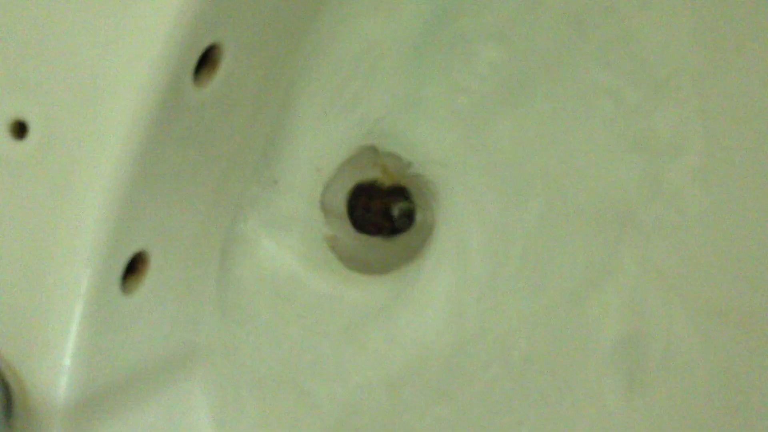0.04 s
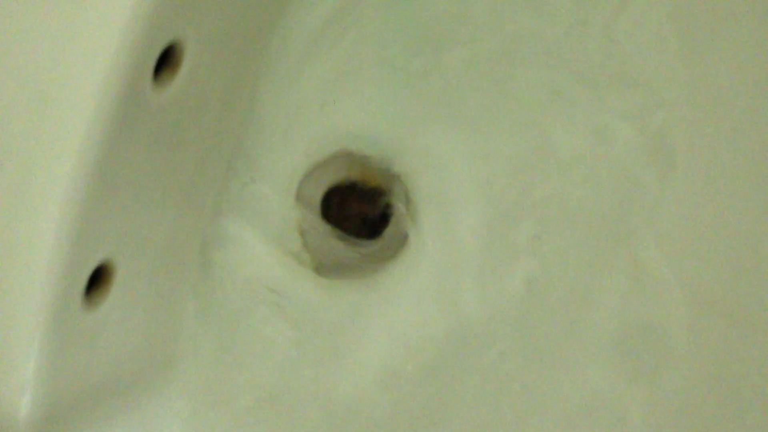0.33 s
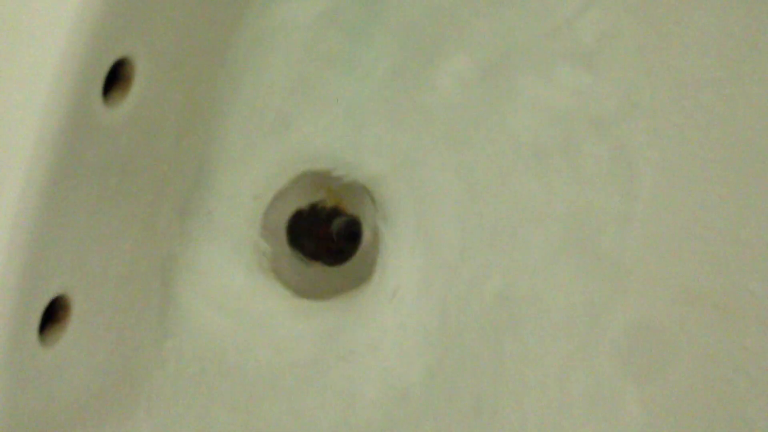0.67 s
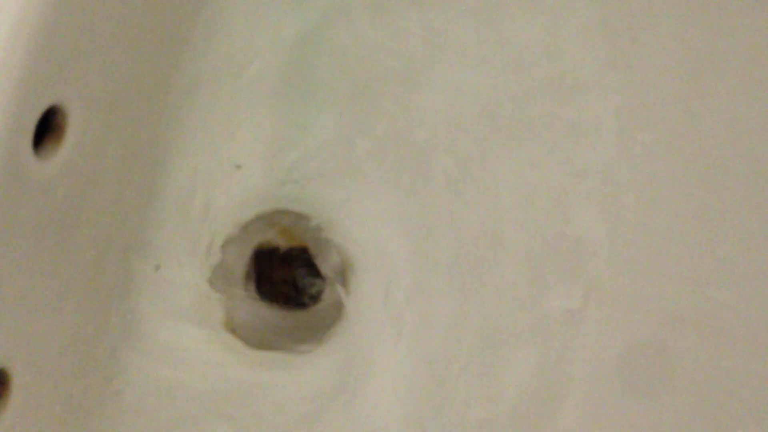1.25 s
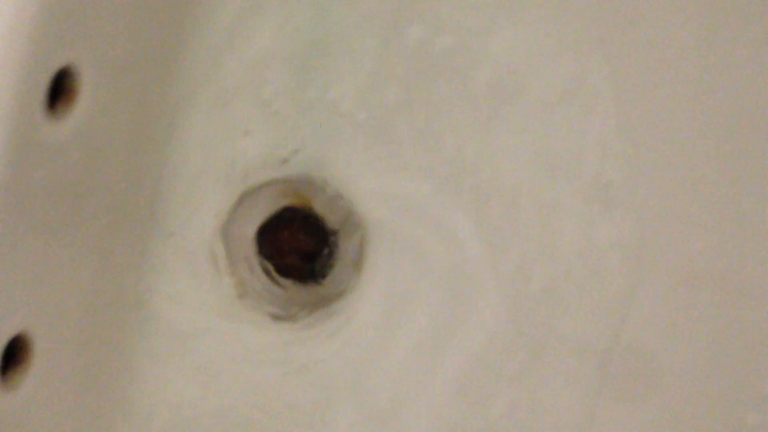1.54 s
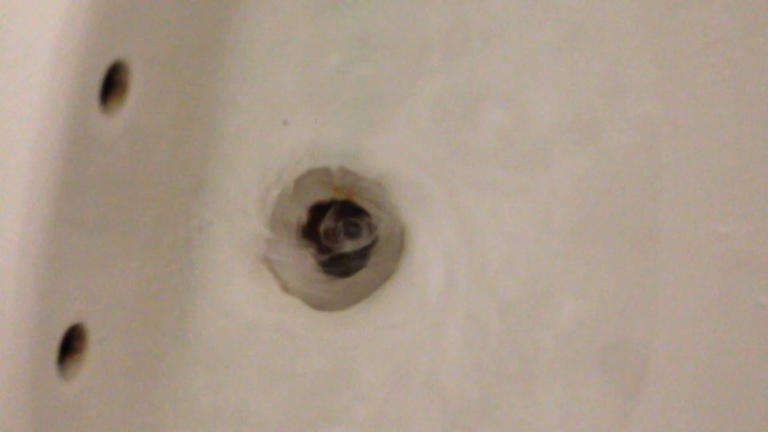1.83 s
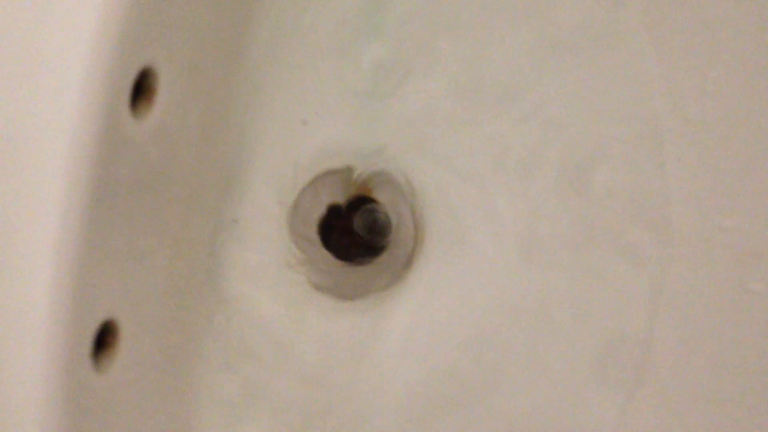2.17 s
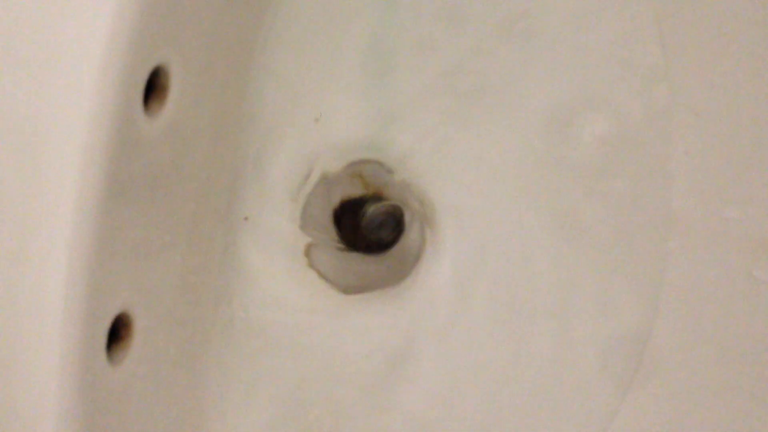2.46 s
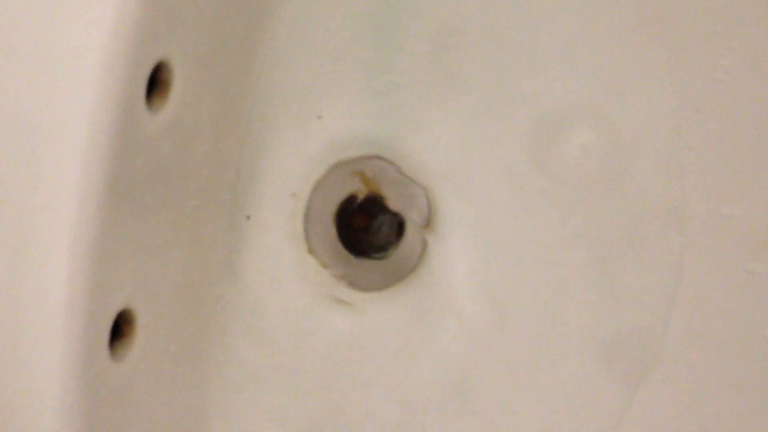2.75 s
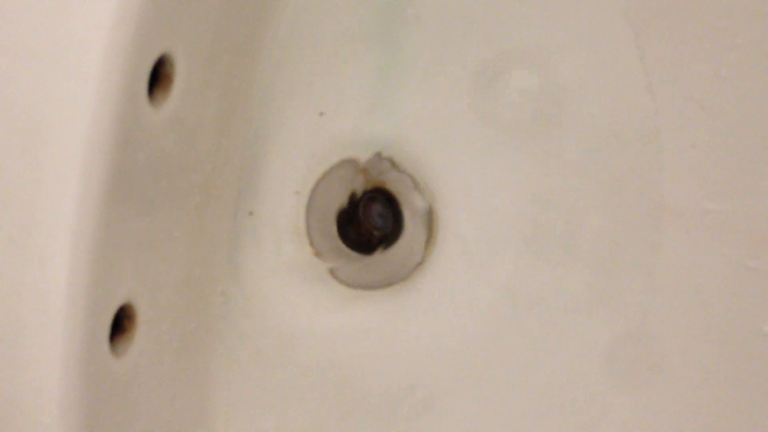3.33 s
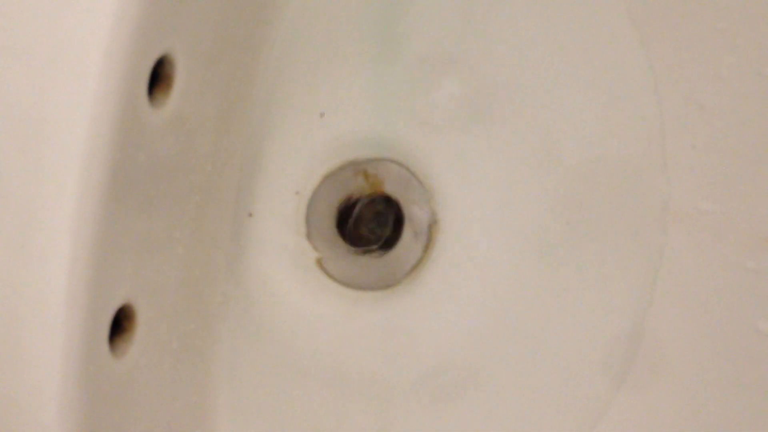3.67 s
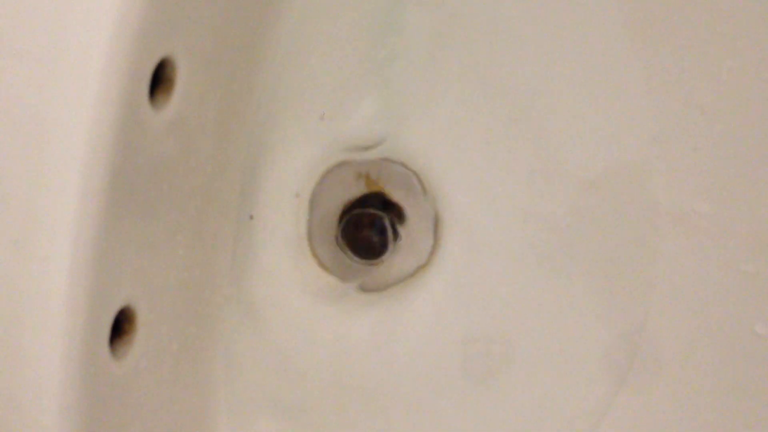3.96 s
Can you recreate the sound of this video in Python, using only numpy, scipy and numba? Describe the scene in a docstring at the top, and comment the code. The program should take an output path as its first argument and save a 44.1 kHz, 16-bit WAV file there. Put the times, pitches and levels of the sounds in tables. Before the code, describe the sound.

Water swirls down a bathtub drain in a small tiled room, a bubbly rush broken by slurps, with gurgles and bloops in the pipe. At about 1.1 seconds the suction drops away, leaving a few drips and ticks until around 1.6 seconds. A very faint whistle swells and fades near 2.2 seconds. A low throbbing motor, like a pump or fan, hums throughout with faint hiss, ending around 4 seconds.

```python
"""The last water swirls down a bathtub drain in a small tiled room. The vortex sucks air: a rush of
tiny bubbles, broken by slurps, while the pipe gurgles and bloops below. After a second the vortex
closes and leaves a few drips and ticks, then a faint whistle swells and fades. A motor, perhaps a
pump or fan, there from the start, throbs on to the end with a faint hiss."""
import sys
import numpy as np
from scipy import signal
from scipy.fft import rfft, irfft
from scipy.io import wavfile
from scipy.ndimage import uniform_filter1d
from numba import njit

SR = 44100
rng = np.random.default_rng(int(sys.argv[2]) if len(sys.argv) > 2 else 0)


def log_audio(samples):
    """Write samples as a 16-bit WAV file to the path given in sys.argv[1]."""
    # one column per channel
    frames = np.atleast_2d(samples).T
    # limit to full scale, then quantise
    limited = np.clip(frames, -1, 1)
    pcm = np.round(limited * 32767).astype(np.int16)
    wavfile.write(sys.argv[1], SR, pcm)


N = 176400
TIME = np.arange(N) / SR

# envelope of the air drawn into the vortex: t/s, level/dB
SUCTION_ENVELOPE = [(.08, -31.5), (.25, -32), (.48, -32.5), (.68, -33), (.78, -33), (.93, -31.5),
                    (1.06, -33), (1.11, -45.5), (1.24, -49.5), (1.45, -51.5), (1.7, -53.5)]
# colour of the rushing bubbles: f/Hz, level/dB
RUSH_EQ = [(380, -44.5), (650, -1.5), (723, -22), (950, -11.5), (1170, -5.5), (1460, -1.5), (1600, -2),
           (1900, -7), (2090, -2), (2480, -1.5), (2690, -1.5), (3150, -3), (4000, 1.5), (4450, -1.5),
           (5360, 1.5), (6120, -2), (7670, -3.5), (9490, -6.5), (11400, -10.5), (14700, -13.5),
           (15500, -12)]
# slurps, each a knot of bubbles: t/s, level/dB, f/Hz, length/s
SLURP_CUES = [(0.135, -25, 2420, .004), (0.16, -22, 4060, .004), (.208, -27.5, 5000, 0.0016),
              (0.232, -26.5, 3870, 0.0019), (0.254, -26, 3950, 0.0028), (0.28, -21.5, 3530, .004),
              (0.326, -26.5, 5630, 0.0024), (0.34, -22, 4430, .002), (0.431, -21.5, 3200, .002),
              (0.454, -25.5, 7400, 0.0029), (0.585, -25.5, 2080, 0.0039), (0.658, -24.5, 3730, .002),
              (0.732, -17, 3450, 0.0027), (0.751, -28, 4460, .002), (0.769, -19, 3080, 0.0041),
              (0.785, -18.5, 3550, 0.0012), (0.813, -23, 4080, 0.0017), (0.837, -20, 2800, .005),
              (0.849, -18, 4310, .003), (.890, -20, 5300, .002), (0.919, -22.5, 3640, 0.0044),
              (.947, -24.5, 3600, 0.0017), (0.967, -27, 5970, .003), (0.981, -24, 2400, .004),
              (1.015, -23.5, 3380, .004), (1.038, -18, 3880, .0015), (1.073, -22.5, 2100, 0.001974),
              (1.096, -29, 1510, 0.00302), (1.114, -30, 3580, 0.0034), (1.281, -33.5, 2330, 0.0024),
              (1.413, -32.5, 4870, 0.0022), (1.417, -33.5, 1560, .003), (1.446, -37.5, 5300, .0015),
              (1.562, -38.5, 1900, .002)]
# resonances of the pipe: f/Hz, width/share of f, level/dB
PIPE_MODES = [(448, 0.07, 6.5), (529, 0.088, 8), (808, .09, 0), (926, 0.037, -1.5), (1208, 0.069, -1.5),
              (1370, 0.037, -5), (1560, 0.025, -1), (1753, 0.022, -3)]
# envelope of the gurgle in the pipe: t/s, level/dB
GURGLE_ENVELOPE = [(.08, -43), (.16, -38.5), (.32, -43), (.7, -44.5), (.98, -42.5), (1.15, -47), (1.6, -50)]
# single large bubbles: t/s, level/dB, f/Hz
BLOOP_CUES = [(.145, -38, 1356), (.147, -31.5, 533), (.152, -31, 850), (.181, -32, 542), (.283, -37, 530),
              (.612, -33, 1560), (.654, -35, 1534), (0.745, -38, 930), (0.945, -34.5, 1364),
              (1.038, -35.5, 1216), (1.381, -37.5, 950)]
# bursting films and drops: t/s, level/dB, f/Hz
TICK_CUES = [(.263, -38, 9500), (.785, -32, 11500), (.877, -36, 11400), (0.9971, -26, 11000),
             (1.0395, -27.5, 7700), (1.2, -33.5, 13800), (1.2795, -46, 8700), (1.318, -51, 11000),
             (1.359, -45, 5440), (2.0655, -50, 9000), (3.307, -43, 10700)]
# envelope of the last droplets: t/s, level/dB
TRICKLE_ENVELOPE = [(1.1, -48.5), (1.35, -53.5), (1.6, -68), (4, -78)]
# harmonics of the motor: multiple of the turn rate, level/dB
MOTOR_HARMONICS = [(2, -27.5), (4, -16), (5, -10.5), (6, -12.5), (7, -6), (8, -4), (9, 1.5), (10, -11.5),
                   (11, -17.5), (13, -12.5), (14, -13), (17, -28.5), (18, -29.5), (19, -16), (20, -21.5),
                   (21, -26.5), (22, -24), (23, -27.5), (25, -20), (26, -26), (28, -28)]
# colour of the motor's airflow: f/Hz, level/dB
RUMBLE_EQ = [(20, -20), (40, -17), (70, -11), (125, -2.5), (200, 0), (330, -11.5), (520, -17.5), (750, -23),
             (1500, -47)]
# colour of the hiss: f/Hz, level/dB
HISS_EQ = [(410, -34.5), (700, -1.5), (728, -5.5), (955, 1.5), (1030, -6), (1220, -0.5), (1320, -9.5),
           (1430, -5), (1560, -15.5), (1690, -4), (1850, -12.5), (2050, -6), (2280, -10.5), (2770, -9),
           (2990, -16), (3540, -19), (4190, -10.5), (4770, -16), (5360, -13), (7030, -21.5), (12400, -27.5),
           (14500, -38), (15500, -34)]

MOTOR_HZ = 23.4  # turns per second


def vortex():
    """Bubbles, fine spray and tiny bursting films come in spurts as long as the swirl draws air."""
    fizz = froth(per_s=9000, scatter_db=4.5)
    spray = undb(-1.5) * rng.standard_normal(N)
    rush = colour(fizz + spray, RUSH_EQ)
    snaps = (rng.random(N) < 1000 / SR) * undb(2 * rng.standard_normal(N))  # about 1000 a second
    sparkle = steep_band(snaps, hz=12100, width=.5)
    spurts = undb(.92 * walk(rate=64))
    return (level(rush, 0) + level(sparkle, -20)) * spurts * envelope(SUCTION_ENVELOPE)


def slurps(count=10, octaves=.25, spatter_s=.013, trim_db=-4):
    """The air core pinches off: a large bubble in a knot of others, a spit of spray, then a spatter."""
    out, t = np.zeros(N), np.arange(SR // 20) / SR
    cycles = np.full(count, 3.7)
    for s, db, hz, length in SLURP_CUES:
        when, pitch, size, late, shed = rng.uniform(-1, 1, (count, 5)).T
        knot = bubbles((1 + when) * length, hz * 2 ** (octaves * pitch), cycles, size, len(t))
        spatter = bubbles(abs(late) * spatter_s, hz * 2 ** shed, 2 * cycles, 1 - abs(late) / 2, len(t))
        spit = steep_band(rng.standard_normal(len(t)), hz, width=.96) * np.exp(-(t / length - 1) ** 2)
        lead = band(large_bubble(hz, cycles=10, samples=len(t)), hz, width=.52)
        db += trim_db
        add(out, s - length, level(knot, 0) + level(spit, -2), db)
        add(out, s - length / 2, lead, db - 11)
        add(out, s, spatter, db - 9)
    return out


def gurgle():
    """Water tumbling down the pipe rings its hollow resonances."""
    tumble = froth(per_s=1900, scatter_db=2)
    pipe = sum(undb(db) * band(tumble, hz, width) for hz, width, db in PIPE_MODES)
    return level(pipe, 0) * envelope(GURGLE_ENVELOPE)


def bloops(ring_s=.011):
    """Large bubbles ring short hollow notes deeper in the pipe."""
    out = np.zeros(N)
    for s, db, hz in BLOOP_CUES:
        add(out, s, large_bubble(hz, cycles=ring_s * hz, samples=SR // 10), db)
    return out


def ticks(decay_s=.00055):
    """Thin films burst with a bright snap."""
    out, t = np.zeros(N), np.arange(SR // 50) / SR
    for s, db, hz in TICK_CUES:
        snap = rng.standard_normal(len(t)) * np.exp(-t / decay_s)
        add(out, s, steep_band(snap, hz, width=.23), db)
    return out


def trickle():
    """A thin layer of droplets tails off as the vortex closes."""
    droplets = colour(froth(per_s=400, scatter_db=4), RUSH_EQ)
    return level(droplets, 0) * envelope(TRICKLE_ENVELOPE)


def froth(per_s, scatter_db, fine_hz=5000):
    """A cloud of bubbles of all sizes, even in spectrum, a few much louder than the rest."""
    when, pitch, ring, loud = rng.random((int(per_s * N / SR), 4)).T
    hz = 400 * 40 ** pitch  # 400 Hz to 16 kHz
    cycles = 4 * 2 ** (2 * ring - 1)
    spread_db = scatter_db * np.minimum(fine_hz / hz, 1) ** .44  # fine bubbles are more alike in level
    accent = -np.log(1 - .995 * loud) - 1.5
    gain = hz / np.sqrt(cycles) * undb(spread_db * accent)
    return level(bubbles(when * N / SR, hz, cycles, gain, N), 0)


def large_bubble(hz, cycles, samples):
    """One large bubble swells, then rings with only a slight upward bend."""
    one = np.ones(1)
    return bubbles(np.zeros(1), hz * one, cycles * one, one, samples, rise=.013, attack_cycles=2.7)


@njit
def bubbles(times, hz, cycles, gain, samples, rise=.041, attack_cycles=.7):
    """Each bubble rings as a damped sine whose pitch climbs by the share `rise` per decay time."""
    out = np.zeros(samples)
    for k in range(len(times)):
        first, decay, phase = int(times[k] * SR), cycles[k] * SR / hz[k], 0.
        for j in range(min(int(5 * decay), samples - first)):
            phase += 2 * np.pi * min(hz[k] * (1 + rise * j / decay), 19000.) / SR
            attack = min(j * hz[k] / (SR * attack_cycles), 1.)
            out[first + j] += gain[k] * attack * np.exp(-j / decay) * np.sin(phase)
    return out


def bathroom(x, tub_t60_s=.021, room_t60_s=.35, damping_hz=7000):
    """Quick reflections inside the tub and a longer tail from the tiles, whose treble dies first."""
    t = np.arange(SR // 2) / SR
    fade = lambda t60: np.exp(-np.log(1000) * t / t60) * (t > .001)
    early, late = rng.standard_normal((2, len(t)))
    low = signal.sosfiltfilt(signal.butter(2, damping_hz, fs=SR, output="sos"), late)
    tub = early * fade(tub_t60_s)
    tiles = low * fade(room_t60_s) + (late - low) * fade(.34 * room_t60_s)
    response = (t == 0) + undb(-11) * tub / np.linalg.norm(tub)
    response += undb(-10) * tiles / np.linalg.norm(fade(room_t60_s))
    return signal.fftconvolve(x, response / np.linalg.norm(response))[:N]


def motor(stroke_s=.0042, rebound_s=.03377, smear_s_per_hz=.000686, rumble_db_per_s=-.3):
    """A stroke and its rebound each turn, smeared by the walls, over a slowly easing airflow rumble."""
    t, hum = TIME - stroke_s, 0
    top_order = MOTOR_HARMONICS[-1][0]
    for order, db in MOTOR_HARMONICS:
        hz = order * MOTOR_HZ
        rebound_phase = np.angle(1 - .62 * np.exp(-2j * np.pi * hz * rebound_s))
        phase = 2 * np.pi * hz * (t - smear_s_per_hz * hz / 2) + rebound_phase
        waver_db = .5 * max(hz / 250, 1) * walk(rate=11)  # deeper above 250 Hz
        rolloff_db = -4 * (order / top_order) ** 2
        hum += undb(db + waver_db + rolloff_db) * np.cos(phase)
    rumble = colour(rng.standard_normal(N), RUMBLE_EQ) * undb(rumble_db_per_s * t)
    return level(hum, -26.5) + level(rumble, -40)


def rub(first_s=.023, half_length_s=.006):
    """The motor rubs briefly once in every turn."""
    turns_from_rub = ((TIME - first_s) * MOTOR_HZ + .5) % 1 - .5
    burst = rng.standard_normal(N) * np.exp(-(turns_from_rub / MOTOR_HZ / half_length_s) ** 2)
    return level(steep_band(burst, hz=950, width=.48), -57)


def hiss():
    """A faint bed of hiss with a slight flutter."""
    noise = colour(rng.standard_normal(N), HISS_EQ)
    return level(noise * undb(.52 * walk(rate=22.03)), -49)


def whistle(peak_s=2.17, swell_s=.26):
    """A faint narrow ring swells and fades after the rush has gone."""
    swell = np.exp(-((TIME - peak_s) / swell_s) ** 2)
    return level(band(rng.standard_normal(N), hz=2070, width=.011), -61.5) * swell


def undb(db):
    """Decibels to gain."""
    return 10 ** (np.asarray(db) / 20)


def level(x, db):
    """Set the rms level."""
    return x * undb(db) / np.sqrt(np.mean(x ** 2))


def envelope(points):
    """A fader ride through points of t/s, level/dB."""
    s, db = np.array(points).T
    return undb(np.interp(TIME, s, db))


def walk(rate):
    """Random levels held 1 / rate s and slewed twice; spread near 1."""
    hold = max(int(SR / rate), 2)
    steps = rng.standard_normal(2000)[np.arange(N) // hold % 2000]
    return 1.28 * uniform_filter1d(uniform_filter1d(steps, hold), hold)


def colour(x, points):
    """Minimum-phase EQ through points of f/Hz, level/dB."""
    hz, db = np.array(points).T
    f = np.maximum(np.fft.rfftfreq(2 * N, 1 / SR), 1)
    gain = undb(np.interp(np.log(f), np.log(hz), db))
    cepstrum = irfft(np.log(gain))
    cepstrum[1:N] *= 2
    cepstrum[N + 1:] = 0
    return irfft(rfft(x, 2 * N) * np.exp(rfft(cepstrum)))[:N]


def band(x, hz, width):
    """One resonance; width as a share of its centre."""
    q = max(1 / width, 4 * hz / SR)
    return signal.lfilter(*signal.iirpeak(hz, q, fs=SR), x)


def steep_band(x, hz, width):
    """The same resonance twice, for steeper skirts."""
    return band(band(x, hz, width), hz, width)


def add(out, s, x, db):
    """Mix in a short sound; its level is the rms it would have over 5 ms."""
    i = int(s * SR)
    x = x * undb(db) * np.sqrt(.005 * SR / np.sum(x ** 2))
    out[i:i + len(x)] += x[:N - i]


def scene():
    """The drain in the room, over motor and hiss."""
    water = vortex() + gurgle() + slurps() + bloops() + ticks() + trickle()
    return (bathroom(water) + whistle() + motor() + rub() + hiss())[None]


def record(dry):
    """A moment of silence, a 2 ms fade-in and a steep cut of the top end."""
    start_s, top_hz = .084, 15300
    fade_in = np.clip((TIME - start_s) / .002, 0, 1)
    return signal.sosfilt(signal.ellip(10, .2, 80, top_hz, fs=SR, output="sos"), dry * fade_in)


dry = scene()
out = record(dry)
log_audio(out)
```